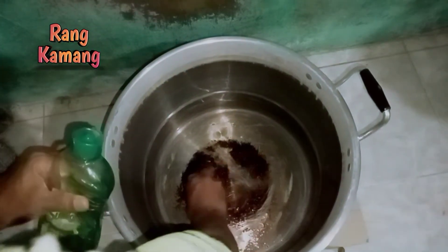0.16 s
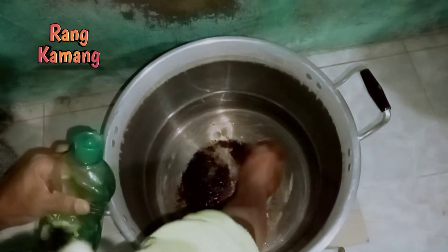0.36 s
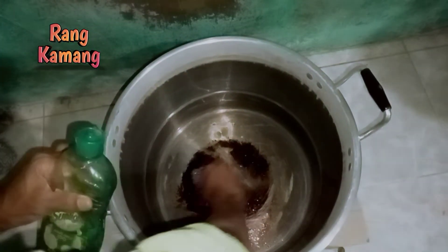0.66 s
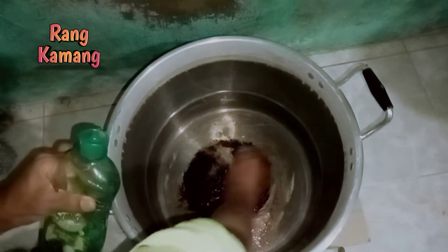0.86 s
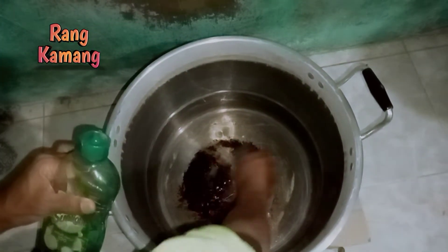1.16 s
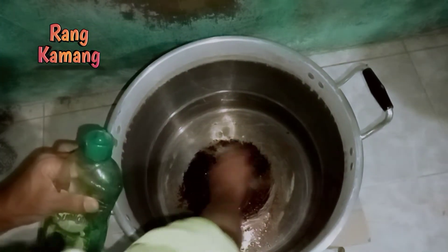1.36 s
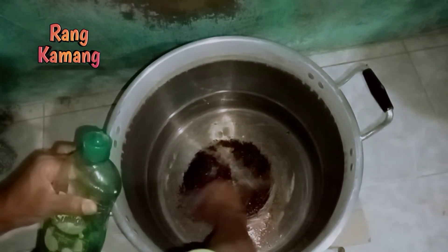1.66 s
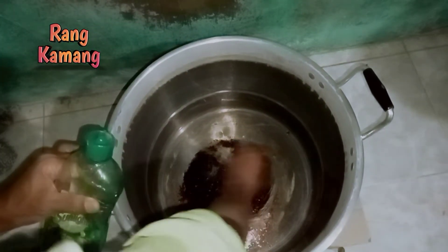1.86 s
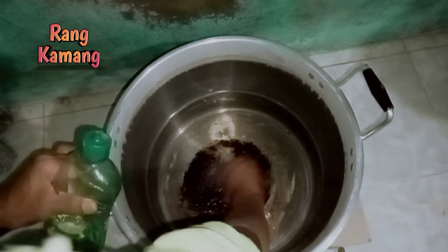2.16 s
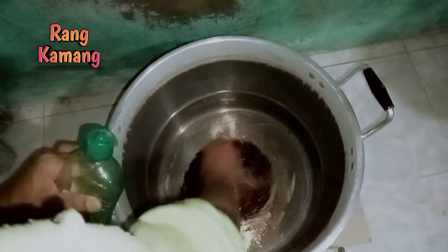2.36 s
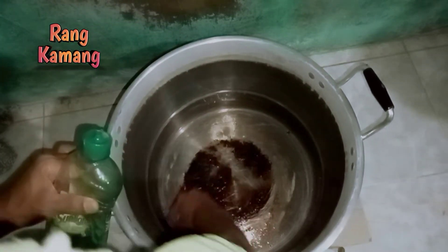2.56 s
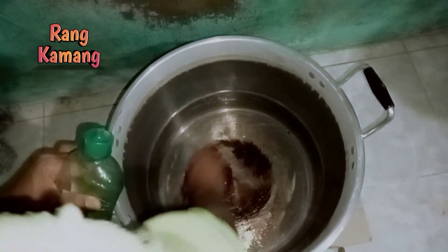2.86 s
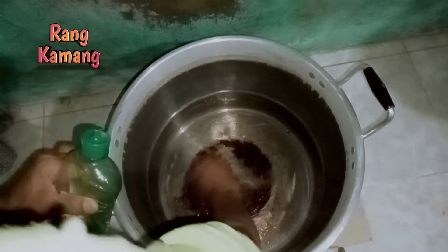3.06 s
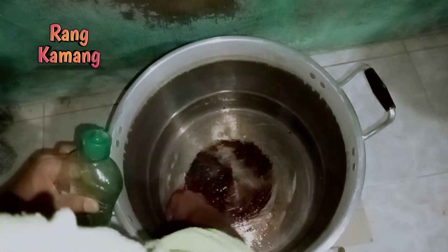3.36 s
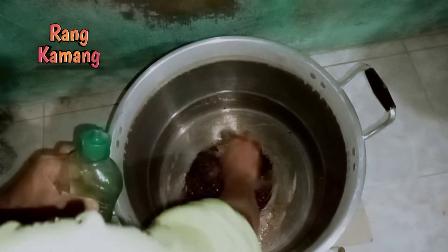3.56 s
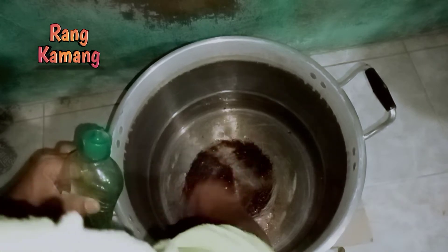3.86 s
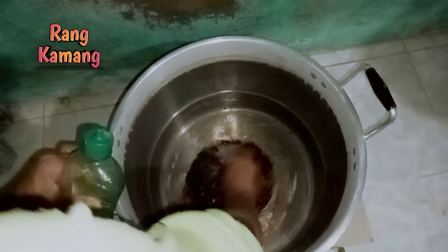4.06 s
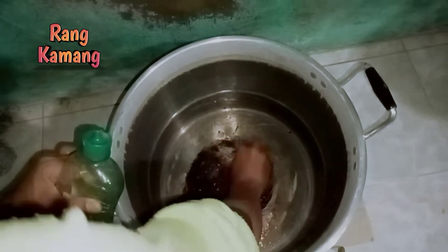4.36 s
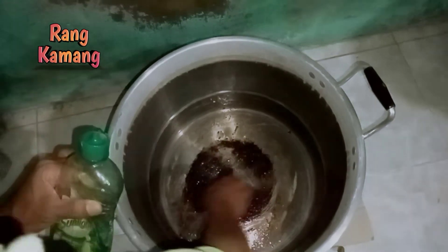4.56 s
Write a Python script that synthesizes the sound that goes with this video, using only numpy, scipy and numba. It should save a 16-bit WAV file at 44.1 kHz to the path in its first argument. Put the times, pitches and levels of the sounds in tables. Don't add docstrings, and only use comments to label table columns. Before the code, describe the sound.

Close, gritty metallic scrubbing inside a hollow cooking pot, uneven strokes and small knocks on tile, cut off suddenly near the end.

```python
import sys
import numpy as np
from scipy import signal
from scipy.fft import rfft, irfft
from scipy.io import wavfile
from scipy.ndimage import uniform_filter1d
from numba import njit

SR = 44100
rng = np.random.default_rng(int(sys.argv[2]) if len(sys.argv) > 2 else 0)


def ratio_of_db(decibels):
    return 10 ** (np.asarray(decibels, float) / 20)


def store_wav(level_fs):
    pcm = np.round(np.clip(np.atleast_2d(level_fs), -1, 1) * 32767)
    wavfile.write(sys.argv[1], SR, pcm.T.astype(np.int16))


N = 208236


def unit(x):
    return x / np.sqrt(np.mean(x ** 2))


def colour(x, spectrum):
    hz, db = np.transpose(spectrum)
    bins = np.maximum(np.arange(N // 2 + 1) * SR / N, 1)
    octaves_outside = np.maximum(np.log2(hz[0] / bins), 0) + np.maximum(np.log2(bins / hz[-1]), 0)
    shape_db = np.interp(np.log(bins), np.log(hz), db) - 46 * octaves_outside
    return unit(irfft(rfft(x) * ratio_of_db(shape_db), N))


@njit
def ring(x, hz, width):
    y, band, low = np.empty(len(x)), 0., 0.
    for i in range(len(x)):
        g, k = np.tan(np.pi * hz[i] / SR), width / hz[i]
        v = (band + g * (x[i] - low)) / (1 + g * (g + k))
        band, low, y[i] = 2 * v - band, low + 2 * g * v, k * v
    return y


def walk(rate):
    hold = int(SR / rate)
    steps = np.repeat(rng.standard_normal(N // hold + 1), hold)
    return unit(uniform_filter1d(uniform_filter1d(steps, hold), hold)[:N])


# f/Hz, level/dB per Hz
AIR_COLOUR = [(40, -13.5), (70, -3), (180, -9.5), (300, -19), (700, -15.5), (1500, -10.5), (3000, -12),
              (5200, -31), (7200, -23), (11000, -30), (15500, -22.5)]


def kitchen():
    air_db, hum_db, hum_hz, hum_width_hz = -60, -59, 116., 20.
    air = colour(rng.standard_normal(N), AIR_COLOUR) * ratio_of_db(air_db + 1.5 * walk(3.2))
    hum = unit(ring(rng.standard_normal(N), np.full(N, hum_hz), hum_width_hz))
    return air + ratio_of_db(hum_db) * hum


def room(x):
    t60_s, room_db = 0.34, -16
    t = np.arange(SR // 2) / SR
    tail = rng.standard_normal(len(t)) * ratio_of_db(-60 * t / t60_s) * (t > .004)
    tail = signal.lfilter([.6], [1, -.4], tail)
    tail = tail / np.sqrt(np.sum(tail ** 2))
    return ratio_of_db(room_db) * signal.fftconvolve(x, tail)[:N]


# t/s, peak level/dB, push/ms
TILE_KNOCKS = [
    (.21, -40, 3),
    (1.06, -40, 3),
    (1.408, -31, 3),
    (2.0, -40, 3),
    (2.4455, -8, 1.8),
    (3.34, -42, 3),
]


def knocks():
    out = np.zeros(N)
    for s, db, ms in TILE_KNOCKS:
        t = np.maximum(np.arange(N) / SR - s, 0) * 1000 / ms
        push = np.sin(np.pi * np.minimum(t, 1)) ** 2
        late = np.maximum(t - .8, 0)
        rebound = np.exp(-late / 2.5) * np.sin(np.pi * late / 2.8)
        crack = np.exp(-t / .8) * np.sin(2 * np.pi * 2.1 * ms * t)
        out += ratio_of_db(db) * (push - .62 * rebound + .5 * crack)
    return out


# t/s, boom centre f/Hz, freedom of the pot to sway level/dB
HAND_PATH = [(0, 1035, 2.5), (.2, 830, 1.5), (.45, 1030, 4), (.65, 606, 2.5), (1.0, 600, -0.5),
             (1.27, 906, 0.5), (1.5, 597, 1), (1.75, 699, -1), (1.92, 1190, 5.5), (2.0, 634, -0.5),
             (2.18, 1050, 0), (2.35, 513, -2), (2.5, 850, -2.5), (2.8, 800, 0), (3.02, 850, -4),
             (3.55, 780, -0.5), (3.85, 950, -4.5), (4.2, 600, 1)]


def hand():
    s, boom_hz, free_db = np.transpose(HAND_PATH)
    t = np.arange(N) / SR
    return np.interp(t, s, boom_hz), np.interp(t, s, free_db)


# fastest at t/s, scrape level/dB, speeding up/s, slowing down/s, floor level/dB
PAD_STROKES = [(0.011, -28, 0.12, 0.13, -6.5), (.175, -20, 0.19, 0.19, -7), (.33, -32, 0.29, 0.13, -8),
               (0.602, -17.5, 0.24, 0.18, -8.5), (0.689, -27.5, 0.1, 0.22, -10),
               (0.993, -18.5, 0.22, 0.28, -7), (1.178, -35, 0.18, 0.13, -7.5), (1.422, -17, 0.24, 0.22, -7),
               (1.585, -22.5, 0.26, 0.18, -4.5), (1.751, -28.5, 0.12, 0.26, -7.5),
               (1.959, -19.5, 0.16, 0.53, -8), (2.21, -32.5, 0.044, 0.041, -11),
               (2.458, -17, 0.24, 0.3, -6), (2.645, -40, 0.044, 0.096, -7.5), (2.79, -44, 0.014, 0.046, -7),
               (2.93, -19, .2, 0.29, -6), (3.13, -35.5, 0.12, 0.067, -6), (3.348, -19, 0.25, 0.21, -6),
               (3.551, -39.5, 0.46, 0.069, -9), (3.631, -37.5, 0.083, 0.082, -2),
               (3.75, -17.5, .17, .2, -7.5), (3.845, -21, 0.12, .15, -4.5),
               (3.965, -28.5, 0.052, 0.14, -10.5), (4.176, -20, .25, 0.14, -6)]
# t/s, level/dB
PAD_SKIPS = [
    (0.156, -5.5),
    (0.606, -5),
    (.989, -3),
    (1.435, -3),
    (2.005, -2.5),
    (3.04, 2.5),
    (3.741, -4.5),
    (3.8, -3),
    (4.146, 0),
]


def strokes():
    db_per_speed, rest_db, skip_s = 5.5, -78, 0.012
    t = np.arange(N) / SR
    power, way, floor_db = ratio_of_db(2 * rest_db), 0, 0
    for s, db, faster_s, slower_s, pot_db in PAD_STROKES:
        along = np.clip((t - s) / np.where(t < s, faster_s, slower_s), -1, 1)
        speed = np.abs(np.cos(np.pi / 2 * along))
        scrape = ratio_of_db(2 * db) * speed ** (2 * db_per_speed)
        power = power + scrape
        way = way + scrape * along
        floor_db = floor_db + scrape * pot_db
    skips_db = sum(db * np.exp(-((t - s) / skip_s) ** 2) for s, db in PAD_SKIPS)
    way = way / power
    hiss_db = -6 - 0.1 * way
    deep_db = -19 + 10 * way
    return 10 * np.log10(power) + skips_db, floor_db / power, hiss_db, deep_db


def catches(share, scatter_db, patchy_db):
    snag = rng.random(N) < np.clip(share, .01, 1)
    size = ratio_of_db(scatter_db * rng.exponential(size=N)) * rng.standard_normal(N)
    return unit(snag * size * ratio_of_db(patchy_db * walk(45)))


# lag/ms, shift by the moving hand/ms, level/dB
POT_ECHOES = [(1.7, 0.27, -7.5), (2.9, .3, -8.5), (4.3, 0.312, -16), (6.1, .3, -14), (8.7, .3, -15)]


def hollow(x):
    now = np.arange(N)
    out = x
    for ms, shift, db in POT_ECHOES:
        heard_from = now - (ms + shift * walk(6)) * SR / 1000
        out = out + ratio_of_db(db) * np.interp(heard_from, now, x, left=0)
    return unit(out)


def modes(x, force, table, wander_db):
    out, power = 0, 0
    for hz, width, db in table:
        swell = ratio_of_db(db + wander_db * np.clip(walk(18), -3, 1.3))
        drive = force * swell * x / np.sqrt(np.pi * width / SR)
        out = out + ring(drive, hz * (1 + 0.0029 * walk(4.4)), 1. * width)
        power = power + ratio_of_db(2 * db)
    return out / np.sqrt(power)


# f/Hz, level/dB per Hz
SWAY_COLOUR = [(45, -12.5), (70, -19), (110, -10.5), (230, -10), (285, 4), (330, -1.5), (400, -5)]


def sway(x, deep_db):
    return colour(x, SWAY_COLOUR) * ratio_of_db(deep_db + 1.9 * walk(20))


# f/Hz, level/dB per Hz
HISS_COLOUR = [(8500, 0), (9500, -11.5), (11000, -1.5), (12300, -4), (13700, 1.5), (14800, 5), (15400, 8),
               (17000, -8.5)]


def wire_hiss(x, hiss_db, light):
    return hollow(colour(x, HISS_COLOUR)) * ratio_of_db(hiss_db - 5.1 * light + 0.93 * walk(30))


# f/Hz, level/dB per Hz
BOOM_COLOUR = [(220, -53), (380, -4.5), (623, 2), (710, -4.5), (1150, -2.5), (1270, 1.5), (1800, -12.5),
               (2340, -39), (3960, -120)]
# f/Hz, width/Hz, level/dB
FLOOR_RINGS = [(477, 19, -13.5), (522, 14, -7.5), (601.4, 72, -1), (827, 83, 7), (966, 21, -13),
               (1059, 25, 2), (1261, 60, 0.5), (1550, 26, -8)]


def pot_floor(x, force, boom_hz):
    broad = hollow(colour(x, BOOM_COLOUR))
    under_hand = unit(ring(broad, boom_hz, 220.))
    boom = force * (ratio_of_db(-2.5) * broad + ratio_of_db(-11.0) * under_hand)
    return boom + ratio_of_db(-9) * modes(x, force, FLOOR_RINGS, wander_db=4.0)


# f/Hz, level/dB per Hz
BODY_COLOUR = [(880, -42.5), (1500, -29.5), (1610, -9), (1800, -12.5), (1950, -8), (2470, -8.5),
               (2590, -4.5), (3450, -0.5), (5130, -15), (7110, -4.5), (9380, -17.5), (10000, -16.5),
               (13000, -38), (22000, -120)]
# f/Hz, width/Hz, level/dB
WALL_RINGS = [(1910, 13.4, -7.5), (2210, 25, -9), (2347, 61, -4), (2650, 99, -3), (3010, 35, -2.5),
              (3110, 17, -6), (3460, 13, -8.5), (3510, 40, 0), (3543, 27, 0), (3840, 38, -4),
              (3860, 30, -12.5), (4060, 90, -4.5), (7200, 50, -7), (7060, 65, -1), (7340, 50, 1),
              (7710, 60, 5.5)]


def pot_wall(x, force, light):
    body = hollow(colour(x, BODY_COLOUR))
    body = body - light * ring(body, np.full(N, 5300.), 950.0)
    return ratio_of_db(-0.83) * force * body + ratio_of_db(-13.5) * modes(x, force, WALL_RINGS, wander_db=3.0)


def scrub(level_db, floor_db, hiss_db, deep_db, boom_hz):
    x = catches(.6, scatter_db=0.95, patchy_db=1.5)
    force = ratio_of_db(level_db)
    light = np.clip((-20 - level_db) / 40, 0, .8)
    wall = pot_wall(x, force, light)
    floor = pot_floor(x, force * ratio_of_db(floor_db), boom_hz)
    return wall + floor + force * (sway(x, deep_db) + wire_hiss(x, hiss_db, light))


def scene():
    level_db, floor_db, hiss_db, deep_db = strokes()
    boom_hz, free_db = hand()
    pot = scrub(level_db, floor_db, hiss_db, deep_db + free_db, boom_hz) + knocks()
    mono = pot + room(pot) + kitchen()
    return np.array([mono, mono])


def low_pass(x):
    return signal.sosfilt(signal.butter(12, 16860, fs=SR, output="sos"), x)


def record(dry):
    cut_s, top_hz = 4.205, 15560
    bass_trim = signal.butter(N=3, Wn=50, btype="high", fs=SR, output="sos")
    top_trim = signal.ellip(12, .5, 80, top_hz, fs=SR, output="sos")
    trimmed = signal.sosfilt(bass_trim, dry)
    gate = np.clip((cut_s - np.arange(N) / SR) * 700, 0, 1)
    mix = signal.sosfilt(top_trim, trimmed * gate)
    return low_pass(mix)


dry = scene()
out = record(dry)
store_wav(out)
```